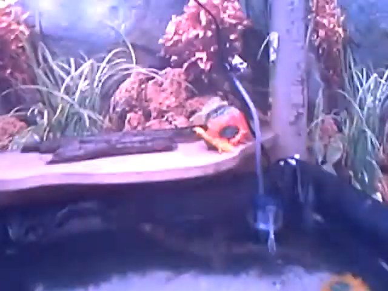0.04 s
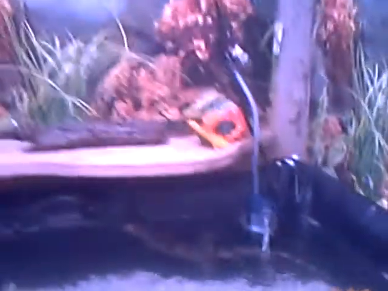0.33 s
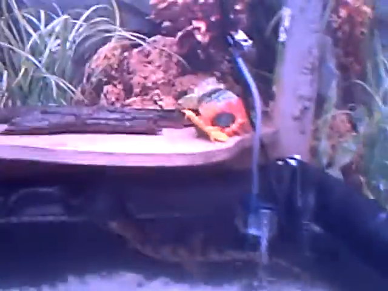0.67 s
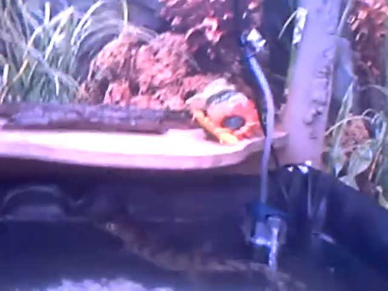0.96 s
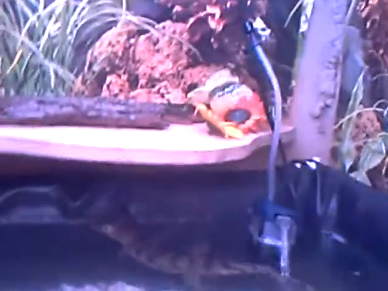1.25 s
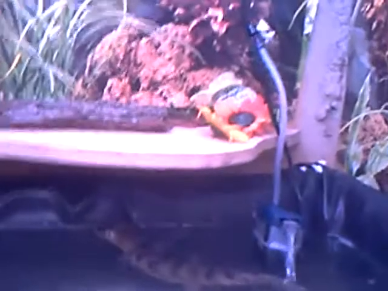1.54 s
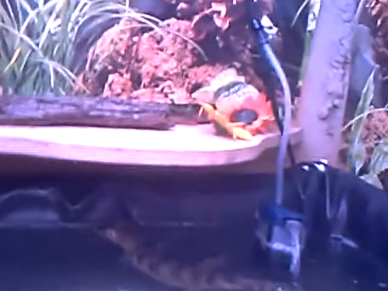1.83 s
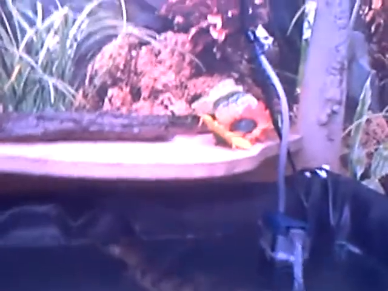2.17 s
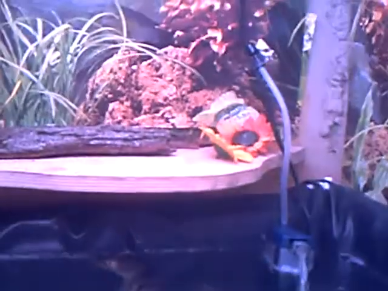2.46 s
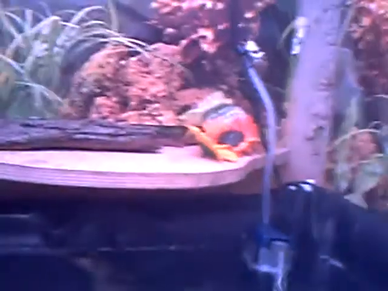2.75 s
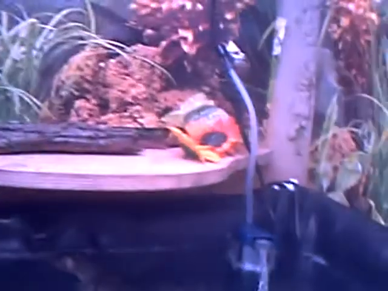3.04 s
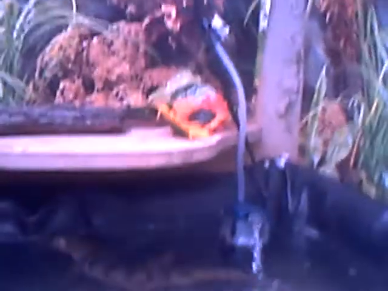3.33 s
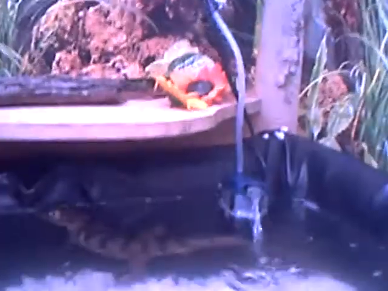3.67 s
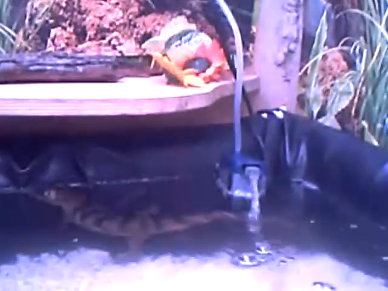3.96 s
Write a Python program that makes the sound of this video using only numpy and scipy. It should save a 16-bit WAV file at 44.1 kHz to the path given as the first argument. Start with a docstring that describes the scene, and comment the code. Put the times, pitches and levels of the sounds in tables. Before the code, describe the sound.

A thin stream of water trickles and splashes steadily into a basin.

```python
"""An indoor terrarium, where a thin stream from a filter outlet falls into the basin.
Each drop strikes the surface with a bright fizz; trapped air bubbles ring briefly as resonators.
Reflections from the walls smear and colour every impact, and the air in the tank rings at its modes.
A pump hums underneath, with room noise, a faint whine and a few faint gliding gurgles.
Close by there are a few dry ticks and one soft bump of handling."""
import sys
import numpy as np
from scipy import signal
from scipy.fft import rfft, irfft
from scipy.io import wavfile
from scipy.ndimage import uniform_filter1d

SR = 44100
rng = np.random.default_rng(int(sys.argv[2]) if len(sys.argv) > 2 else 0)


def wav_record(signal):
    """Record a signal, one row per channel, as 16-bit PCM in the file named by sys.argv[1]."""
    frames = np.transpose(np.atleast_2d(signal))
    bounded = np.clip(frames, -1, 1)
    # unit amplitude maps onto the largest positive 16-bit level
    quanta = np.round(bounded * 32767).astype(np.int16)
    wavfile.write(sys.argv[1], SR, quanta)


N = 176400
TIME = np.arange(N) / SR
AGE = np.arange(5000) / SR  # time since the onset of one short event [s]


def undb(db):
    """Decibels to amplitude ratio."""
    return 10 ** (np.asarray(db) / 20)


def fade(t60, t=AGE):
    """Exponential damping: 60 dB down after t60 seconds."""
    return np.exp(-np.log(1000) * t / t60)


def unit(x):
    """Normalise to unit energy."""
    return x / np.sqrt(np.sum(x ** 2))


def peak(x, db):
    """Normalise to a peak level."""
    return x * undb(db) / np.abs(x).max()


def crest(x, db):
    """Give the loudest 5 ms the power of a sinusoid with this peak level."""
    return x * undb(db) / np.sqrt(2 * uniform_filter1d(x ** 2, size=220).max())


def add(out, start, x):
    """Superpose a sound at a start time in seconds."""
    i = int(np.clip(start * SR, 0, N - 1))
    out[i:i + len(x)] += x[:N - i]


def band(x, hz, width_hz):
    """Two identical band-pass resonators in cascade."""
    b, a = signal.iirpeak(min(hz, SR / 3), hz / width_hz, fs=SR)
    return signal.lfilter(b, a, signal.lfilter(b, a, x))


def colour(x, points):
    """Zero-phase filtering by a curve of (frequency [Hz], gain [dB])."""
    hz, db = np.array(points).T
    bins = np.maximum(np.fft.rfftfreq(N, 1 / SR), 1)
    return irfft(rfft(x) * undb(np.interp(np.log(bins), np.log(hz), db)), N)


def crackle():
    """Heavy-tailed noise: many small clicks and a few large ones."""
    noise = rng.standard_normal(len(AGE))
    return noise * np.abs(noise)


def pump():
    """Periodic vibration of the pump radiates a fundamental and its second harmonic."""
    # harmonics of the hum (frequency [Hz], rms level [dB])
    harmonics = [(100, -73.5), (200, -91.5)]
    return sum(np.sqrt(2) * undb(db) * np.sin(2 * np.pi * (hz * TIME + rng.random()))
               for hz, db in harmonics)


def whine():
    """A linear frequency sweep, heard as a very faint rising tone."""
    hz = 251 + 23.5 * TIME
    return np.sqrt(2) * undb(-84) * np.sin(2 * np.pi * np.cumsum(hz) / SR)


def room():
    """Broadband ambient noise, weighted to low frequencies: rumble and faint hiss."""
    # room noise spectrum (frequency [Hz], relative spectral density [dB])
    spectrum = [(25, 4), (60, 6), (130, -0.5), (200, -1.5), (300, -1.5), (450, -3.5), (650, -8), (1400, -1),
                (2500, -13.5), (4500, -17.5), (7000, -37), (10500, -8.5)]
    air = colour(rng.standard_normal(N), spectrum)
    return undb(-65) * air / air.std()


def walls(x):
    """Reverberation: direct sound, early reflections and a short tail, different for each spot."""
    early, late = rng.standard_normal((2, len(AGE)))
    response = undb(12.5) * unit(early * fade(t60=0.052)) + undb(1.5) * unit(late * fade(t60=0.13))
    response[0] += 1  # direct path
    return signal.fftconvolve(x, response)[:len(AGE)]


def bubble(hz, db):
    """Minnaert resonance: after a surface slap, a trapped bubble and its smaller twin ring and fade."""
    t60 = 0.052 * (1000 / hz) ** 0.42  # smaller bubbles die sooner
    rising_hz = hz * (1 + 0.048 * np.minimum(AGE / t60, 1))
    cycles = np.cumsum(rising_hz) / SR
    envelope = fade(t60) * (1 - np.exp(-cycles / 0.33))
    ring = np.sin(2 * np.pi * cycles) * envelope
    twin = np.sin(2 * np.pi * cycles * rng.uniform(1.12, 1.5)) * envelope * fade(t60)
    slap = band(crackle() * fade(t60=0.016), hz * 1.464, width_hz=hz * 1.47)
    return crest(unit(walls(ring)) + undb(-10) * (unit(walls(twin)) + unit(walls(slap))), db)


def stream_bubbles():
    """Air entrainment: the stream traps clear bubbles, and two weaker ones break off after each."""
    # trapped bubbles (time [s], relative level [dB], frequency [Hz])
    bubbles = [(0.001, -37, 1197), (0.065, -47, 1690), (0.124, -45, 1556), (0.173, -38, 1257),
               (0.308, -52, 1550), (0.329, -44, 1117), (0.333, -43, 1980), (0.581, -41.5, 922),
               (0.615, -44.5, 1234), (0.644, -52.5, 1410), (0.695, -42.5, 878), (0.729, -46, 1880),
               (0.831, -32, 1440), (0.859, -47, 1370), (0.903, -49, 867), (0.939, -46.5, 967),
               (0.995, -37.5, 1635), (1.068, -46, 1310), (1.172, -38.5, 1463), (1.189, -64, 1520),
               (1.224, -50, 1007), (1.254, -45, 2054), (1.313, -40, 1606), (1.344, -51, 3020),
               (1.453, -42.5, 990), (1.491, -47, 1520), (1.526, -38.5, 1011), (1.545, -43.5, 1345),
               (1.576, -39.5, 1094), (1.623, -45, 1338), (1.749, -48, 1154), (1.791, -40, 1052),
               (1.839, -46.5, 1280), (1.875, -45.5, 1030), (1.899, -47.5, 1337), (1.938, -47, 958),
               (2.04, -42.5, 1900), (2.138, -38.5, 1893), (2.159, -42.5, 1734), (2.208, -49, 1550),
               (2.273, -45, 1090), (2.312, -46.5, 1656), (2.36, -47, 3460), (2.404, -49.5, 1280),
               (2.436, -38.5, 2520), (2.465, -47, 1575), (2.572, -38.5, 1806), (2.607, -43.5, 1268),
               (2.69, -48.5, 1510), (2.74, -37.5, 1895), (2.809, -34.5, 1315), (2.829, -45, 1233),
               (2.890, -34.5, 932), (2.944, -38, 1295), (2.971, -46, 1377), (2.999, -47, 1700),
               (3.043, -46, 1050), (3.059, -45, 1520), (3.184, -48.5, 862), (3.216, -43, 1383),
               (3.317, -44, 867), (3.339, -43, 2333), (3.368, -40, 1944), (3.434, -43.5, 1115),
               (3.485, -44.5, 1790), (3.501, -38, 2380), (3.535, -40, 1445), (3.545, -44.5, 2135),
               (3.579, -39, 893), (3.6, -46, 1310), (3.647, -47, 1600), (3.676, -46, 3060),
               (3.683, -37.5, 1330), (3.715, -42, 1230), (3.736, -38.5, 1054), (3.792, -42, 2186),
               (3.818, -51, 1060), (3.855, -47.5, 1930), (3.939, -47.5, 1643), (0.0797, -43.5, 3990),
               (0.2174, -47, 5210), (0.636, -48.5, 3320), (1.2287, -45.5, 3860), (1.513, -36, 3290),
               (1.6153, -46, 5460), (1.776, -40, 3090), (2.0326, -40, 6910), (2.2583, -42.5, 3060),
               (2.311, -42, 6160), (2.4358, -43, 5700), (2.5284, -41, 3184), (2.6297, -46.5, 5110),
               (2.7294, -45.5, 4030), (2.943, -48.5, 3130), (2.9698, -43.5, 2730), (3.1276, -40, 4170),
               (3.1644, -45, 5930), (3.4643, -40.5, 3020), (3.6182, -43, 4240), (3.9299, -46.5, 4580),
               (3.966, -46.5, 4310)]
    lead_s, spread_octaves, lowest_hz = 0.002, 0.234, 780
    out = np.zeros(N)
    for start, db, hz in bubbles:
        add(out, start - lead_s, bubble(hz, db - 2))
        for detune, strength in rng.standard_normal((2, 2)):
            fragment_hz = max(hz * 1.02 * 2 ** (spread_octaves * detune), lowest_hz)
            fragment = bubble(fragment_hz, db - 17.5 + 1.5 * strength)
            add(out, start + rng.uniform(0.0065, 0.045), fragment)
    return out


def splash(hz, db, spray_db):
    """Impact noise: a crack and broad spray under a fizz of tiny bubbles, trailing off as drops fall."""
    hold_s = 0.0028
    burst = fade(t60=0.0037, t=np.maximum(AGE - hold_s, 0)) + undb(-14) * fade(t60=0.019)
    fizz = band(crackle() * burst, hz, width_hz=2050)
    spray = band(crackle() * burst, hz=6000, width_hz=10000)
    crack = band(crackle() * fade(t60=0.0096), hz=2340, width_hz=2600)
    impact = unit(spray) + undb(-4) * unit(crack)
    return crest(walls(unit(fizz) + undb(spray_db + 2.5) * impact), db)


def stream_splashes():
    """An irregular train of impacts: the drops of the stream strike the surface."""
    # drop impacts (time [s], relative level [dB], fizz centre [Hz], relative spray level [dB])
    impacts = [(0.0141, -35, 9200, -5), (0.0458, -38, 9200, -7), (0.1385, -42.5, 10800, -36),
               (0.1695, -43.5, 9300, -8), (0.2188, -41, 9200, -21), (0.3253, -42.5, 10600, -19),
               (0.3476, -37, 10100, -9), (0.386, -35.5, 9100, -16), (0.4192, -41.5, 10700, 2),
               (0.4791, -30, 9800, -14.5), (0.5916, -38, 10200, -23), (0.6393, -42.5, 10300, -7),
               (0.671, -48, 10200, 3), (0.824, -37.5, 9100, -14), (0.8558, -41.5, 9400, 6),
               (0.8773, -34.5, 10100, -9), (0.956, -39, 10700, -6), (0.9767, -37.5, 10300, -8),
               (1.13, -40, 10000, -13), (1.168, -37.5, 9500, -12), (1.1903, -39, 10000, -7),
               (1.3582, -41, 11100, -27), (1.4075, -33.5, 10600, -31), (1.536, -43, 10300, -8),
               (1.5689, -31.5, 10150, -13), (1.714, -38.5, 9700, -14.5), (1.7399, -50, 7770, 13),
               (1.7877, -40, 9400, -16), (1.8354, -42.5, 10600, -31), (1.9312, -39.5, 8300, -3),
               (1.9927, -35, 9660, -8.5), (2.0329, -33, 7200, -28), (2.106, -40, 9250, -5),
               (2.159, -42.5, 9700, -2), (2.212, -35.5, 8160, -28), (2.2688, -34.5, 10100, -14.5),
               (2.3157, -37.5, 9900, -17), (2.336, -48, 9500, 14), (2.3559, -31, 9500, -11),
               (2.4057, -41, 8700, -28), (2.4356, -34, 10000, -0.5), (2.5271, -32, 10100, -8),
               (2.57, -34.5, 11000, -19), (2.6322, -30.5, 9400, -12.5), (2.6892, -34.5, 10200, -9),
               (2.7407, -36.5, 10100, 7), (2.7882, -35, 9500, -35), (2.8075, -40, 10100, 2),
               (2.942, -44, 8500, -11), (2.9574, -44, 10300, -27), (3.0443, -38.5, 9000, -33),
               (3.0737, -37, 10400, 18), (3.1425, -37, 8300, -31), (3.2512, -41, 10400, 2),
               (3.3138, -38.5, 10800, -4), (3.392, -38, 10300, -9.5), (3.42, -31, 8330, -22),
               (3.576, -35, 8150, -7), (3.6154, -38.5, 9900, -6), (3.853, -37, 10000, -5.5),
               (3.8943, -38.5, 9200, -9), (3.928, -34.5, 8900, -31), (3.965, -36, 10000, -9.5)]
    lead_s = 0.0005
    out = np.zeros(N)
    for start, db, hz, spray_db in impacts:
        add(out, start - lead_s, splash(hz, db - 7, spray_db))
    return out


def patter():
    """Independent random events: small bubbles and stray droplets, spread uniformly in time."""
    bubbles_per_s, droplets_per_s, low_hz, high_hz = 35, 55, 1026, 4336
    out = np.zeros(N)
    for _ in range(int(bubbles_per_s * N / SR)):
        hz = low_hz * (high_hz / low_hz) ** rng.random()
        add(out, rng.random() * N / SR, bubble(hz, db=-57.5))
    for _ in range(int(droplets_per_s * N / SR)):
        droplet = splash(hz=rng.uniform(7550, 10830), db=-54.5, spray_db=-5)
        add(out, rng.random() * N / SR, droplet)
    return out


def tank(x):
    """Cavity resonance: the water's sound excites the damped modes of the air in the tank."""
    # air modes (frequency [Hz], relative level [dB])
    modes = [(806, 3.5), (871, -5.5), (928, -3.5), (1060, 4.5), (1545, 9), (1692, 3.5), (1994, -9)]
    t = np.arange(SR // 2) / SR
    decay = fade(t60=0.11, t=t)
    response = sum(undb(db) * np.sin(2 * np.pi * hz * t) for hz, db in modes) * 2 * decay / decay.sum()
    return x + undb(-4.5) * signal.fftconvolve(x, response)[:N]


def spatter():
    """Shot noise: dense impulses of the finest spray, smeared by wall reflections."""
    hits_per_s = 900
    hits = (rng.random(N) < hits_per_s / SR) * np.exp(rng.standard_normal(N))
    smeared = signal.fftconvolve(hits - hits.mean(), walls(np.ones(1)))[:N]
    sizzle = band(smeared, hz=9370, width_hz=7800)
    return undb(-68) * sizzle / sizzle.std()


def ticks():
    """Heavily damped modes: dry knocks with a snap and a thin upper ring, coloured by near surfaces."""
    # knocks (time [s], relative level [dB], pitch [Hz], ring gain [dB], snap gain [dB], cutoff [Hz])
    knocks = [(0.179, -40, 2760, -8, -3.5, 7000), (0.6755, -29.5, 2800, -0.5, 0.5, 11000),
              (0.8038, -30.5, 2400, -13, -5.5, 3230), (0.924, -30, 2600, -1, -17, 9000),
              (1.0957, -17.5, 2570, 5.5, -14, 11000), (1.558, -41, 2660, -26, -22, 3970),
              (1.705, -46, 2550, -22, -4, 3500)]
    # modes of a knock (ratio to its pitch [1], relative level [dB], 60 dB decay time [s])
    modes = [(0.371, -7.5, 0.021), (.59, -4, 0.022), (0.862, -4.5, 0.019), (1.03, 11, 0.0064),
             (1.25, -13, 0.003)]
    # a curve for near surfaces, defined but not applied to the knocks (frequency [Hz], gain [dB])
    surfaces = [(300, -17), (700, -19), (950, -6.5), (3400, 0.5), (4800, -2), (6300, -2), (7400, -3),
                (8500, -2.5), (10500, 6.5)]
    rise_s = 0.00026
    attack = 1 - np.exp(-AGE / rise_s)
    ring = sum(np.sin(2 * np.pi * hz * AGE) for hz in (7540, 8110)) * fade(t60=0.0068)
    out = np.zeros(N)
    for start, db, hz, ring_db, snap_db, cutoff_hz in knocks:
        body = sum(undb(mode_db) * np.sin(2 * np.pi * hz * ratio * AGE) * fade(t60)
                   for ratio, mode_db, t60 in modes)
        snap = band(rng.standard_normal(len(AGE)) * fade(t60=0.007), hz=4800, width_hz=7500)
        knock = unit((body + undb(ring_db) * ring) * attack) + undb(snap_db) * unit(snap)
        echo = signal.fftconvolve(knock, unit(crackle() * fade(t60=0.018)))[:len(AGE)]
        tick = signal.lfilter(*signal.butter(4, cutoff_hz, fs=SR), knock + undb(-12) * echo)
        add(out, start, peak(tick, db + 2))
    return out


def gurgles():
    """Frequency modulation: faint pure tones glide in pitch."""
    # one path per gurgle, with points of (time [s], frequency [Hz], rms level [dB])
    paths = [
        [(1.265, 767, -84), (1.32, 709, -63), (1.36, 734, -72), (1.405, 760, -71), (1.435, 795, -75)],
        [(3.18, 842, -64), (3.205, 810, -51.5), (3.24, 783, -74), (3.265, 740, -65.5), (3.295, 740, -74)],
        [(.93, 850, -56), (.975, 1306, -65)],
        [(1.532, 1066, -56), (1.563, 2076, -50)],
        [(1.878, 1045, -55), (1.92, 2195, -67)],
    ]
    out = np.zeros(N)
    for path in paths:
        times, hz, db = np.array(path).T
        gate = uniform_filter1d(1.0 * ((TIME > times[0]) & (TIME < times[-1])), size=440)  # 10 ms ramps
        amplitude = np.sqrt(2) * undb(np.interp(TIME, times, db))
        cycles = np.cumsum(np.interp(TIME, times, hz)) / SR
        out += gate * amplitude * np.sin(2 * np.pi * cycles)
    return out


def bump():
    """A damped low oscillation with a slow onset: one soft bump of handling."""
    pitch_hz, rise_s = 74.1, 0.028
    t, out = np.arange(SR) / SR, np.zeros(N)
    rumble = band(rng.standard_normal(SR), hz=43, width_hz=160)
    thud = unit(np.sin(2 * np.pi * pitch_hz * t)) + undb(-5) * unit(rumble)
    envelope = fade(t60=0.5, t=t) * (1 - np.exp(-(t / rise_s) ** 2))
    add(out, start=1.406, x=peak(thud * envelope, db=-48))
    return out


def scene():
    """Superposition, in mono, of the water, the background, the near ticks and the bump."""
    # colouring of the water at the listening point (frequency [Hz], gain [dB])
    water_colour = [(400, -8), (650, -9), (850, -1.5), (1500, 0.5), (2100, -2.5), (2700, -4), (4200, -7),
                    (6000, -0.5), (8000, -2), (10500, 0)]
    basin = tank(stream_bubbles() + stream_splashes() + patter())
    water = colour(basin + spatter(), water_colour) + gurgles()
    background = pump() + whine() + room()
    return (background + bump() + ticks() + water)[None]


def record(dry):
    """Band limiting: a steep elliptic low-pass removes the top of the spectrum."""
    cutoff_hz = 11050
    return signal.sosfilt(signal.ellip(10, 0.2, 70, cutoff_hz, fs=SR, output="sos"), dry)


dry = scene()
out = record(dry)
wav_record(out)
```